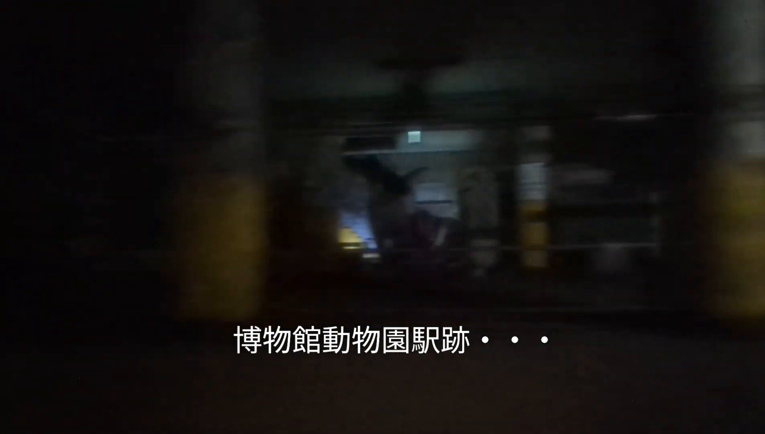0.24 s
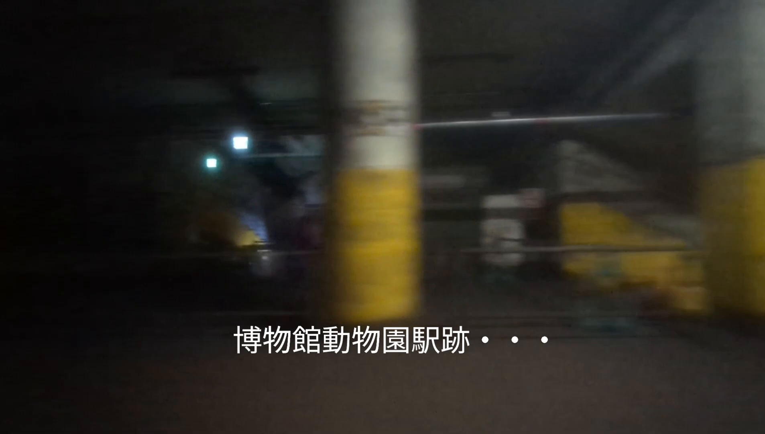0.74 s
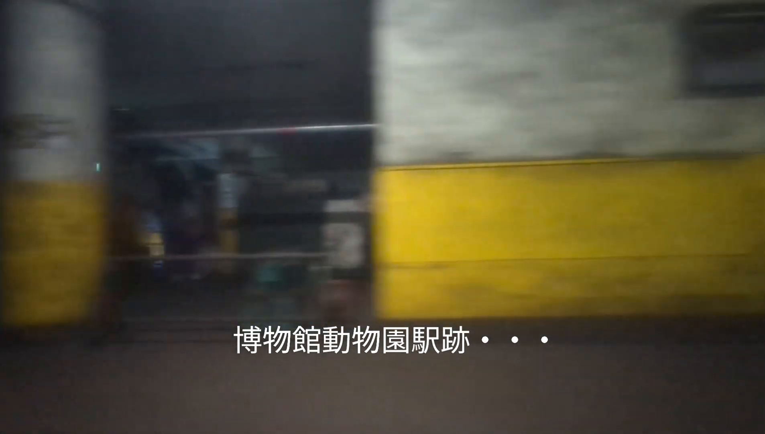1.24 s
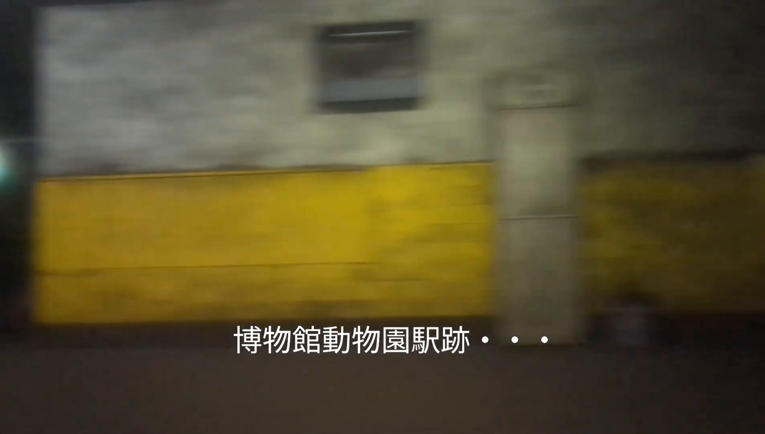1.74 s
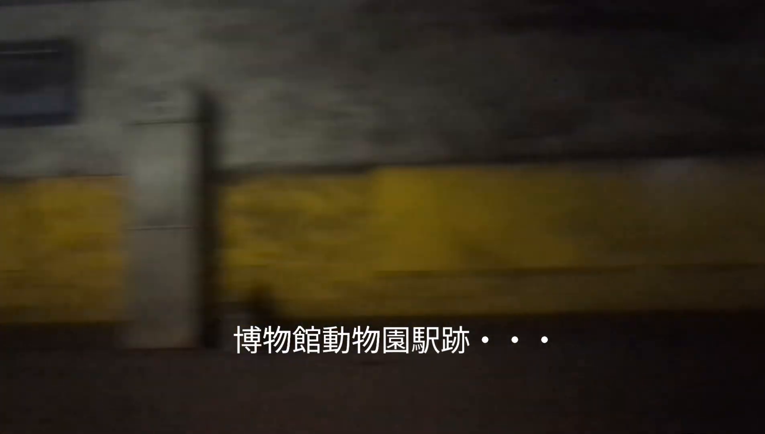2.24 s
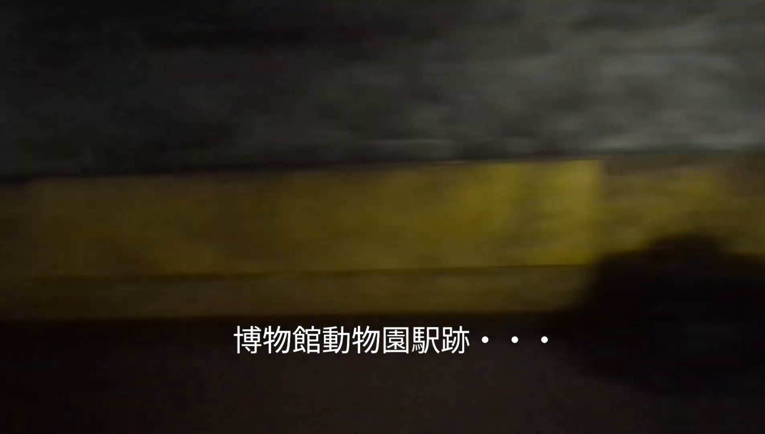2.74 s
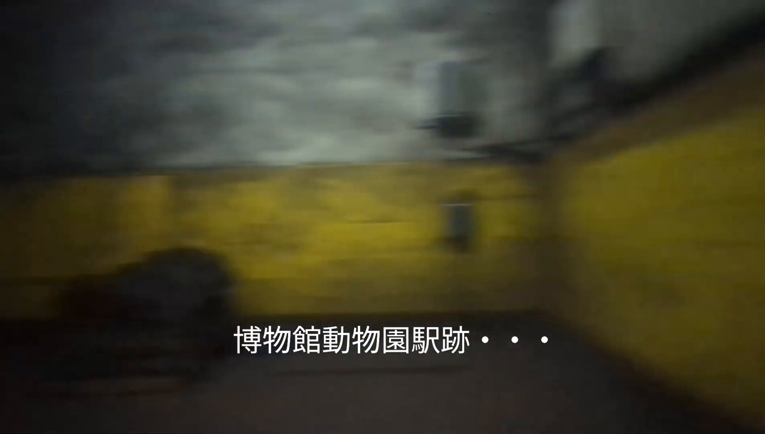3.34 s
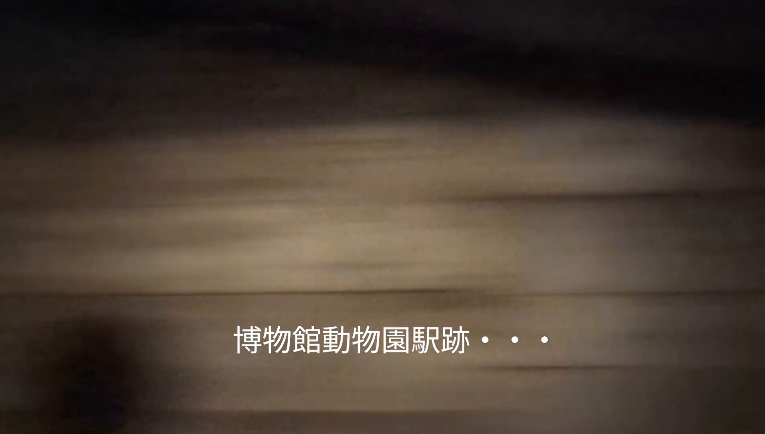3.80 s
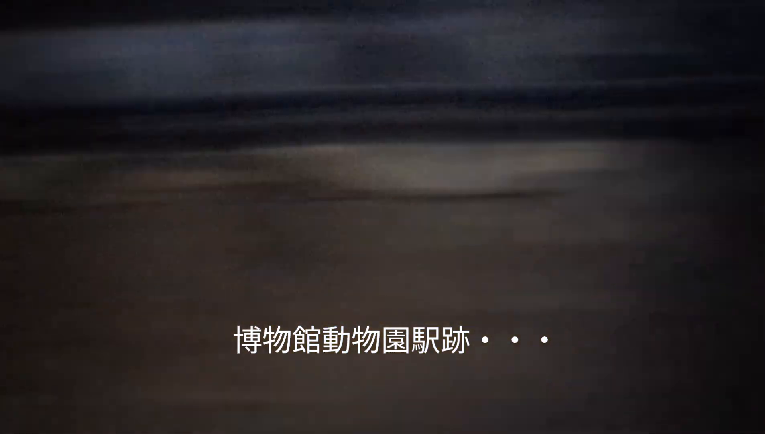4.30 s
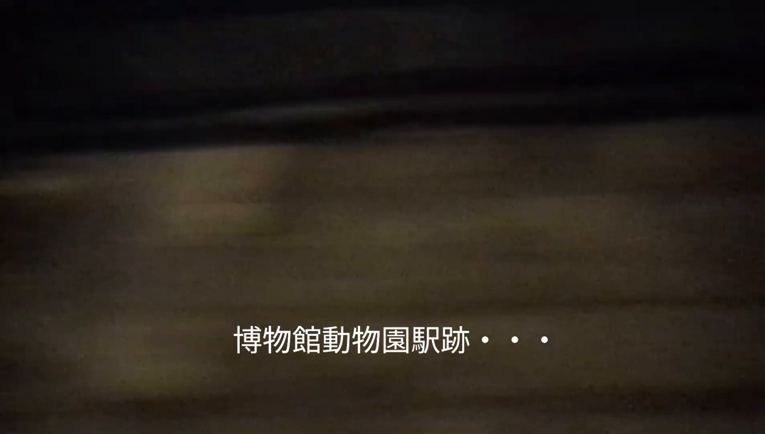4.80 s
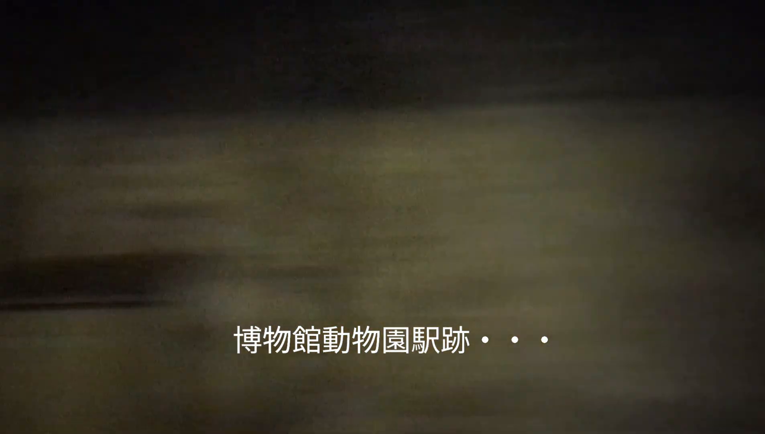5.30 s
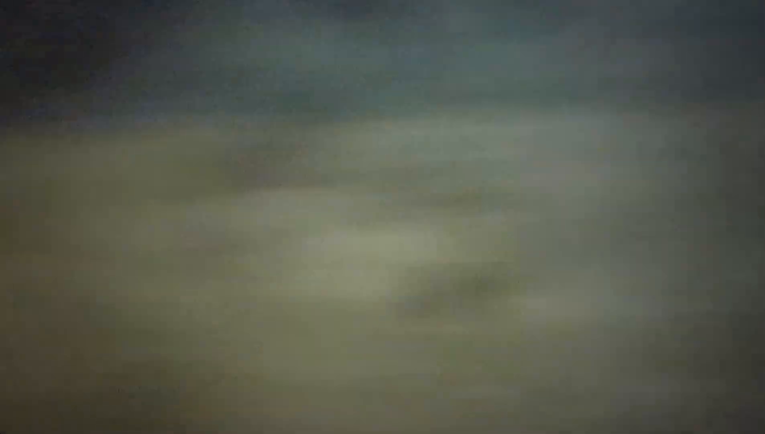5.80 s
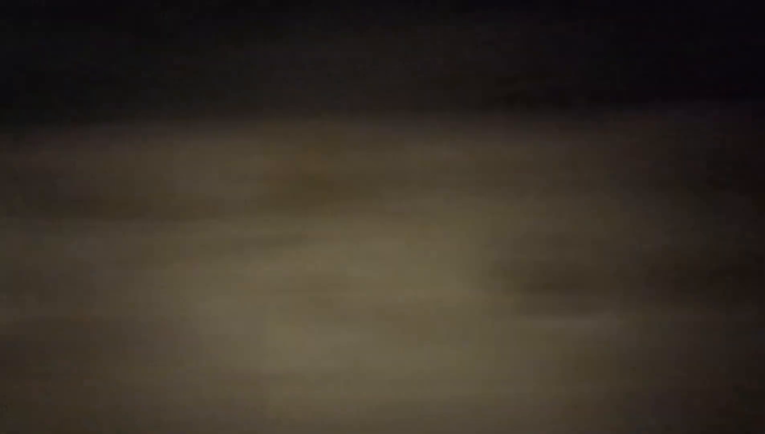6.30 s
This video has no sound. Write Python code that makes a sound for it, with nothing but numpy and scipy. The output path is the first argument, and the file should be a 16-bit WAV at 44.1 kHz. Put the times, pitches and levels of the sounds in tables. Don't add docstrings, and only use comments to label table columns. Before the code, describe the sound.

From 0 s a train already rolls steadily through an underground tunnel, heard inside the car on a nearby stereo microphone with subdued treble. A deep rumble around 50 to 80 hertz dominates, throbbing in uneven soft thumps several times a second, over muffled wheel and rail roar. Around 1.8 to 2.3 s rough rail makes the roar swell; a firm knock at 2.1 s leaves floor and wall panels humming briefly. From 2.5 to 3.3 s it settles, with very faint flange squeal. At about 3.4 s heavy body heaves begin and the roar thickens near closer walls. From 4.2 s small dry trim ticks scatter, with tiny pings at 4.9 s. The booms continue through 5 to 6 s while draughty hiss rises; clustered clanks come at 5.7 to 6.1 s. The roar then eases, ending mid-ride around 6.5 s with a low jolt.

```python
import sys
import numpy as np
from scipy import signal
from scipy.fft import rfft, irfft, next_fast_len
from scipy.io import wavfile
from scipy.ndimage import uniform_filter1d

SR = 44100
rng = np.random.default_rng(int(sys.argv[2]) if len(sys.argv) > 2 else 0)


def rack_gain(trim_db):
    fader = np.asarray(trim_db, float)
    return 10 ** (fader / 20)


def store_wav(level_fs):
    pcm = np.round(np.clip(np.atleast_2d(level_fs), -1, 1) * 32767)
    wavfile.write(sys.argv[1], SR, pcm.T.astype(np.int16))


N = 288833

# time_s, lift_db
WALL_NEARNESS = [(0, -1.5), (.3, 0.5), (.75, -1.5), (1.0, -1.5), (1.6, -0.5), (2.0, -1.5), (2.55, 1.5),
                 (2.72, -1.5), (3.1, 0), (3.55, 0.5), (3.8, 3), (4.6, 1), (4.85, 1.5), (5.3, 3), (5.6, 2.5),
                 (6.2, 2), (6.45, -0.5), (6.55, -1.5)]
# time_s, lift_db
WINDOW_DRAUGHT = [
    (0, 0),
    (1.7, -1),
    (2.0, 1),
    (3.5, 1.5),
    (3.9, 1.5),
    (5.0, 3.5),
    (5.25, 4),
    (6.2, 5),
    (6.55, 5),
]
# middle_s, roar_lift_db, length_s, floor_lift_db
ROUGH_STRETCHES = [(0.254, 2, 0.092, 0.5), (0.599, 0.5, 0.34, 3), (0.968, 1.5, 0.14, 0),
                   (1.372, 1.5, .15, -4), (1.893, 4.5, 0.28, 7.5), (2.069, 1, .06, -1.5),
                   (2.129, 1.5, 0.05, -5.5), (2.247, 6, 0.22, 7), (2.837, 2.5, 0.2, -0.5),
                   (3.202, 0, 0.11, 2), (3.685, -0.5, 0.23, 2.5), (3.946, 1.5, .17, 0.5),
                   (4.281, 3.5, 0.12, 1.5), (4.619, 0, 0.085, 2.5), (5.059, 1.5, 0.19, 3.5),
                   (5.312, 0.5, 0.13, 1), (5.619, 0.5, 0.078, 3.5), (5.733, 2, 0.19, 1.5),
                   (5.834, 0.5, .08, 1.5), (6.074, 5, 0.084, 1.5)]
# middle_s, rms_db, length_s, pitch_hz
BODY_HEAVES = [(0.315, -20.5, 0.032, 70.6), (0.422, -16.5, 0.018, 68), (0.491, -19, 0.039, 61.9),
               (0.582, -19.5, 0.039, 75.1), (0.677, -19, 0.029, 70.4), (0.861, -13, 0.031, 60.7),
               (1.155, -17, 0.017, 67.1), (1.333, -17, 0.077, 56.2), (1.42, -17, 0.026, 65.6),
               (1.545, -17, 0.05, 57), (1.717, -17.5, 0.034, 61.4), (1.838, -22, 0.025, 66.2),
               (1.902, -16.5, 0.021, 60.7), (2.104, -13.5, 0.044, 61.4), (2.214, -23, 0.023, 67.7),
               (2.297, -19, 0.043, 74.3), (2.522, -19, 0.03, 72.9), (3.202, -18, 0.047, 76.6),
               (3.43, -12, 0.032, 63.4), (3.543, -12.5, 0.025, 58.06), (3.636, -14, 0.041, 57.0),
               (3.748, -16, 0.024, 66.5), (3.847, -16, 0.044, 57.26), (3.936, -17.5, 0.026, 74.3),
               (4.052, -15, 0.056, 60.6), (4.146, -18, 0.034, 65.5), (4.218, -14.5, 0.024, 70.7),
               (4.325, -19.5, 0.021, 65.1), (4.431, -18.5, 0.042, 68.1), (4.547, -19, 0.038, 67.3),
               (4.609, -12, 0.021, 62.46), (4.667, -22.5, 0.016, 64.6), (4.93, -15, 0.078, 68.27),
               (4.986, -20, 0.0077, 70.7), (5.071, -13, 0.018, 76), (5.222, -13.5, 0.039, 66.1),
               (5.405, -17, 0.062, 64.7), (5.478, -14, 0.024, 69.5), (5.58, -15, 0.066, 58.8),
               (5.647, -26.5, 0.037, 73), (5.716, -12, 0.02, 65.8), (5.8, -20, 0.039, 71.3),
               (5.875, -15.5, 0.038, 66.1), (5.939, -18.5, 0.03, 64), (6.042, -18.5, 0.069, 59.35),
               (6.116, -26.5, 0.055, 63.5), (6.183, -15, 0.029, 66.95), (6.285, -19.5, 0.082, 62.8),
               (6.382, -20.5, 0.02, 68.7), (6.468, -19.5, 0.023, 74.7)]


def rms_one(x):
    return x / np.sqrt(np.mean(x ** 2) + 1e-20)


def in_time(rows):
    s, *columns = np.transpose(rows)
    return [np.interp(np.arange(N) / SR, s, c) for c in columns]


def at_hz(points, hz):
    point_hz, point_db = np.transpose(points)
    return np.interp(np.log(hz), np.log(point_hz), point_db)


def humps(rows, heights):
    t = np.arange(0, N + 64, 64) / SR
    bells = np.array([np.exp(-(2 * (t - s) / max(length, .02)) ** 2) for s, _, length, *_ in rows])
    return np.interp(np.arange(N) / SR, t, heights @ bells)


def drift(rate_hz):
    r = np.exp(-80 * np.pi * rate_hz / SR)
    noise = rng.standard_normal(N // 40 + 2002)
    slow = signal.lfilter([1], [1, -2 * r, r * r], noise)[2000:]
    return np.interp(np.arange(N) / 40, np.arange(len(slow)), rms_one(slow))


def resonate(x, hz, width_hz):
    r = np.exp(-np.pi * width_hz / SR)
    poles = [1, -2 * r * np.cos(2 * np.pi * hz / SR), r * r]
    return signal.lfilter([(1 - r * r) / 2, 0, (r * r - 1) / 2], poles, x)


def spread(x, left_db):
    return x * rack_gain(np.array([[.5], [-.5]]) * left_db)


def swings(rows, waver_hz):
    out, t = np.zeros(N), np.arange(N) / SR
    waver = np.cumsum(waver_hz * drift(8)) / SR
    for (s, db, length, hz), start in zip(rows, rng.random(len(rows))):
        near = slice(max(int((s - .4) * SR), 0), int((s + .4) * SR))
        bell = np.exp(-2 * ((t[near] - s) / max(length, .02)) ** 2)
        swing = np.sin(2 * np.pi * (hz * t[near] + start + waver[near]))
        out[near] += np.sqrt(2) * rack_gain(db) * bell * swing
    return out


def boom(even, side_db):
    # mode_hz, width_hz
    body_modes = [(49, 12), (62, 9.8), (84, 25)]
    # start_s, level_db, pitch_hz
    final_push = (6.5445, -11, 45)
    out = 0
    for (hz, width_hz), gain in zip(body_modes, body_levels()):
        x = resonate(resonate(rng.standard_normal((2, N + SR)), hz, width_hz), hz, 1.65 * width_hz)
        x = rms_one(x[:, SR:])
        power = uniform_filter1d(uniform_filter1d(x * x, size=2000), size=2000)
        swell = np.sqrt(np.abs(power) + 0.055)
        out = out + gain * rms_one(x / swell ** even)
    out[0] += swings(BODY_HEAVES, waver_hz=2.0)
    shell = signal.butter(2, [35, 112], "band", fs=SR, output="sos")
    mid, side = signal.sosfiltfilt(shell, out)
    s, db, hz = final_push
    t = np.maximum(np.arange(N) / SR - s, 0)
    push = rack_gain(db) * np.sin(2 * np.pi * hz * t)
    return mid + rack_gain(side_db) * side * [[1], [-1]] - push


def body_levels():
    rest_db = [-30, -25.5, -28]
    # time_s, lift_db
    track_bed = [(0, 1.5), (.6, -2.5), (1.0, -0.5), (1.5, 1.5), (1.95, -2.5), (2.02, -9), (2.2, 3.5),
                 (2.6, -0.5), (3.0, -4.5), (3.3, 2.5), (3.75, 3), (4.3, 3), (4.75, -0.5), (5.3, 3),
                 (5.9, 3.5), (6.3, 6), (6.42, -2.5), (6.55, -6)]
    # middle_s, lift_db, length_s
    hum_lulls = [(.09, -0.5, .05), (.225, -9, 0.052), (.36, -7, 0.034), (.77, -6, 0.058), (.905, -7, .03),
                 (.96, 3, 0.056), (1.085, -8, .03), (1.22, -6, 0.034), (1.385, -4, .03), (1.65, -2, 0.054),
                 (2.42, -1.5, .05), (2.66, 1, .04), (2.75, 1.5, .1), (2.97, -3.5, .1), (3.1, 4.5, .07),
                 (3.29, -9, 0.076), (3.36, 6, 0.046), (3.595, -8.5, .03), (3.69, -7, .03),
                 (4.185, -9, 0.028), (4.5, -5.5, .04), (4.75, -2, .08), (4.85, 0.5, 0.056),
                 (5.02, -5.5, .03), (5.31, -4.5, .05), (5.97, -6, .06), (6.11, 3, .05), (6.255, -8, 0.037),
                 (6.43, -5, .05), (6.5, -8, .04)]
    hush = 1 - .8 * np.minimum(humps(BODY_HEAVES, np.ones(len(BODY_HEAVES))), 1)
    lift_db = in_time(track_bed)[0] + humps(hum_lulls, np.array(hum_lulls)[:, 1])
    return rack_gain(np.array(rest_db)[:, None] + lift_db) * hush


def rolling(patchy_db, rough_db):
    layer_hz = [175, 420, 1350, 3600, 9000]
    # freq_hz, density_db_per_hz
    mid_spectrum = [(100, -4), (117, -8.5), (156, -6), (290, -3.5), (371, -9), (600, -13.5), (900, -22),
                    (1900, -30.5), (2100, -32.5), (3200, -42), (4500, -53), (6000, -60), (9000, -81),
                    (15000, -76)]
    # freq_hz, density_db_per_hz
    side_spectrum = [(100, 2.5), (135, -9.5), (240, -13.5), (487, 0.5), (617, -14), (1300, -19),
                     (1480, -19.5), (2100, -23.5), (3200, -35.5), (4500, -44), (6000, -51.5), (9000, -71),
                     (14500, -68), (15500, -73.5)]
    # freq_hz, left_minus_right_db
    stereo_lean = [(100, 1.5), (210, -0.5), (320, 2.5), (500, 0.5), (760, 0.5), (1150, 4.5), (1760, 3),
                   (2680, 2), (5000, -2)]
    # mode_hz, width_hz, mid_lift_db, side_lift_db
    car_resonances = [(132.2, 18, 10.5, -4.5), (195, 21, 6.5, -0.5), (412, 14, 4, -3.5), (490, 32, 5, -5.5),
                      (554.5, 22, 4, 5), (953, 24, 5, 6.5), (1210, 1100, 4.5, 9), (1720, 350, 5.5, -1.5),
                      (4020, 53, 3, 5.5), (7000, 550, 3, 3.5), (8500, 1100, 6, 4.5)]
    size = next_fast_len(N)
    hz = np.maximum(np.arange(size // 2 + 1) * SR / size, 1)
    peaks = np.array([1 / (1 + (2 * (hz - f) / w) ** 2) for f, w, *_ in car_resonances])
    mid_db, side_db = np.array(car_resonances)[:, 2:].T @ peaks
    mid, side = rfft(rng.standard_normal((2, size)))
    mid = mid * rack_gain(at_hz(mid_spectrum, hz) + mid_db) * hz ** 4 / (hz ** 4 + 90.4 ** 4)
    side = side * rack_gain(at_hz(side_spectrum, hz) + side_db - 8) * hz ** 4 / (hz ** 4 + 82.0 ** 4)
    pair = np.array([mid + side, mid - side]) * rack_gain(np.outer([.5, -.5], at_hz(stereo_lean, hz)))
    lifts_db = track()
    swells_db = lifts_db - lifts_db.mean(axis=1, keepdims=True)
    out, shared = 0, drift(35)
    for octave in np.arange(6, 14.5, .5):
        offset = np.log2(np.clip(hz, 64, 16384)) - octave
        window = np.cos(np.pi * np.clip(offset, -.5, .5)) ** 2
        place = np.interp(octave * np.log(2), np.log(layer_hz), np.arange(5))
        nearest_two = np.clip(1 - np.abs(place - np.arange(5)), 0, 1)
        swell_db = nearest_two @ swells_db
        flutter_db = patchy_db * drift(4.3) + rough_db * shared * (octave / 10) ** 0.53
        out = out + rack_gain(swell_db + flutter_db) * irfft(pair * window, size)[:, :N]
    return rack_gain(-28) * rms_one(out)


def track():
    by_walls = [1.1, 1.2, 0.97, 1, 2.6]
    by_draught = [.02, .02, 0.088, 0.81, 2.4]
    by_rail = [.1, .6, 0.948, 1.199, 1.4]
    by_floor = [0.46, 0.69, 0.35, 0.038, .05]
    _, rail_db, _, floor_db = np.transpose(ROUGH_STRETCHES)
    causes_db = [in_time(WALL_NEARNESS)[0], in_time(WINDOW_DRAUGHT)[0],
                 humps(ROUGH_STRETCHES, rail_db), humps(ROUGH_STRETCHES, floor_db)]
    return np.transpose([by_walls, by_draught, by_rail, by_floor]) @ causes_db


def panel_rings():
    # middle_s, rms_db, length_s, pitch_hz
    ring_events = [(.62, -36, 0.072, 190.6), (1.82, -27.5, 0.024, 195), (1.87, -25.5, 0.076, 206.2),
                   (2.125, -30.5, 0.018, 520), (2.148, -29.5, 0.035, 505), (2.15, -38, 0.037, 650),
                   (2.185, -37, 0.023, 600), (2.245, -42, .04, 1200), (2.25, -44, 0.019, 950),
                   (2.24, -37, .03, 420), (1.95, -35, 0.052, 195), (2.232, -25, 0.075, 134),
                   (2.24, -24.5, 0.019, 185), (2.31, -29, 0.089, 280), (2.57, -31.5, 0.029, 208),
                   (2.32, -25.5, 0.072, 214.4), (2.8, -38, 0.071, 506), (3.22, -39.5, 0.074, 520),
                   (3.33, -34.5, 0.033, 181), (3.43, -36, 0.085, 186.5), (3.57, -35, 0.079, 276),
                   (3.67, -34.5, 0.022, 295), (3.70, -32, 0.11, 204), (3.766, -32.5, 0.052, 133),
                   (3.945, -37.5, 0.067, 299), (4.0, -32, 0.04, 490), (4.253, -31.5, 0.033, 200),
                   (3.85, -35, 0.077, 530), (4.72, -34, 0.058, 202), (4.99, -33.5, 0.034, 287),
                   (5.1, -33.5, 0.088, 500), (5.17, -30.5, 0.07, 284), (5.19, -25, 0.044, 132),
                   (5.31, -29.5, .04, 313), (5.33, -42, 0.037, 129), (5.33, -32, 0.017, 515),
                   (5.62, -28, 0.04, 197), (5.63, -34, 0.026, 132), (5.77, -33, 0.04, 280),
                   (5.823, -28, 0.038, 222), (6.04, -36.5, 0.082, 500), (5.76, -39, 0.14, 548)]
    return spread(swings(ring_events, waver_hz=14), left_db=2)


def joints(bright_db):
    # start_s, peak_db, clank_hz, clank_t60_s, thud_db
    knocks = [(1.7882, -51.5, 2140, 0.52, 2), (2.2, -47.5, 4000, .8, -20), (1.9, -40.5, 2160, 0.3, -7),
              (2.1130, -19.5, 793, 0.25, -26), (2.113, -32.5, 1900, 0.15, -25.5),
              (2.2094, -44.5, 2300, 0.39, -14), (2.2683, -35, 2230, 1, 2.5),
              (2.792, -47.5, 2200, 0.57, -14.5), (4.9853, -34.5, 2220, 0.47, -11.5),
              (5.0, -39, 3900, 0.5, -20), (4.913, -32.5, 900, .08, -25), (6.1, -30, 800, .08, -25),
              (5.8, -25.5, 2470, 0.12, -19), (5.68, -30.5, 1200, .3, -25), (5.735, -25, 1300, 0.35, -25),
              (6.043, -23, 2200, 0.065, -28), (6.0356, -34, 3400, 0.091, -19),
              (6.0481, -22.5, 2000, 0.11, -27), (6.058, -21, 1600, 0.066, -26),
              (6.0515, -23, 1260, 0.8, -29)]
    out, t = np.zeros((2, N + SR)), np.arange(SR) / SR
    glass = signal.butter(2, 3500, "low", fs=SR, output="sos")
    for s, db, hz, t60, thud_db in knocks:
        noise = rng.standard_normal((3, SR))
        strike = noise[:2] + 1.5 * noise[2]
        clank = resonate(resonate(strike, hz, 0.9 * hz), hz, 2 * hz)
        clank = rms_one(signal.sosfilt(glass, clank))
        clank = clank * rack_gain(bright_db - 60 * t / max(t60, .05)) * (1 - np.exp(-t / .0015))
        thud = rms_one(resonate(resonate(noise[2], 205, 40), 205, 120))
        thud = thud * rack_gain(thud_db - 60 * t / .5) * (1 - np.exp(-t / 0.054))
        out[:, round(s * SR):][:, :SR] += rack_gain(db) * (clank + thud)
    return out[:, :N]


def squeal(share_db):
    # mode_hz, width_hz
    wheel_modes = [(3450, 83), (3660, 110), (3977, 110), (4265, 54), (2700, 290), (1837, 49)]
    modes_rest_db = [-82.5, -82, -85.5, -87.5, -79.5, -65]
    # middle_s, low_mode_lift_db, length_s, high_mode_lift_db, middle_mode_lift_db
    flange_rubs = [(0.573, 2, 0.047, 14, -4.5), (1.625, 3.5, .08, 0, 1), (1.9, 1.5, .2, 2, 3),
                   (2.27, 5, .12, 4, 9), (2.587, 8.5, 0.16, 8.5, 8.5), (2.84, 8, 0.15, 10, 5),
                   (3.112, 8, 0.09, 14, 2), (3.193, 13, 0.12, 1.5, 8), (3.662, 5, 0.09, 7, 5.5),
                   (3.997, 3, 0.1, -1.5, 6.5), (4.642, 7, 0.15, -2, 10), (4.88, 15, 0.036, 2, 6),
                   (5.033, 6, 0.2, 8.5, 8)]
    low_db, high_db, middle_db = (humps(flange_rubs, np.array(flange_rubs)[:, k]) for k in (1, 3, 4))
    sing_db = 2 * in_time(WINDOW_DRAUGHT)[0]
    rail_db = humps(ROUGH_STRETCHES, np.array(ROUGH_STRETCHES)[:, 1])
    load_db = 2.2 * in_time(WALL_NEARNESS)[0] + 1.8 * rail_db
    lifts_db = [low_db, middle_db, high_db, 0, sing_db - .6 * load_db, -.5 * load_db]
    out = 0
    for (hz, width_hz), rest_db, lift_db in zip(wheel_modes, modes_rest_db, lifts_db):
        mode = resonate(resonate(rng.standard_normal((2, N)), hz, width_hz), hz, 2 * width_hz)
        mode_db = rest_db + load_db + lift_db + share_db + 1.9 * drift(4.4)
        out = out + rack_gain(mode_db) * rms_one(mode)
    return out


def trim(tick_db, body_db, ping_db, crackle_db):
    # start_s, snap_db, left_minus_right_db, rattle_db
    tick_events = [(.622, -72, -0.5, -73), (1.145, -77.5, -2.5, -75), (2.273, -60, -2.5, -60),
                   (2.285, -63.5, 0.5, -61), (2.3, -61.5, 0.5, -63), (2.31, -64, 0, -63),
                   (2.6288, -64.5, -5, -63), (2.7867, -64, -5, -68), (3.8374, -68, -5, -61),
                   (3.895, -70, -4.5, -66.5), (3.9289, -64, -6.5, -59.5), (3.9937, -68, -7, -66),
                   (4.0228, -69.5, -13, -65.5), (4.1466, -67, -3, -62.5), (4.1925, -60.5, -3, -63),
                   (4.2206, -59.5, 3.5, -60.5), (4.232, -61, -2.5, -65), (4.283, -52, -7, -63),
                   (4.3711, -67.5, -5.5, -60), (4.4251, -57.5, -2.5, -63), (4.461, -60.5, 3.5, -63),
                   (4.57, -66, -3, -67), (4.674, -63, -4, -59), (4.7026, -66, -2.5, -65.5),
                   (4.7664, -51, -2.5, -52.5), (4.778, -65, -3, -62.5), (5.0708, -64.5, -1.5, -62),
                   (5.1475, -51, -12, -55.5), (5.2504, -59, -12.5, -70), (5.3134, -66, -1.5, -65.5),
                   (5.387, -56.5, 1.5, -56.5), (5.472, -54.5, 0.5, -68), (5.5543, -57.5, -5.5, -67.5),
                   (5.58, -60.5, -2, -63), (5.6404, -55.5, -3.5, -69), (5.681, -56, -6, -61),
                   (5.727, -62.5, -10.5, -58), (5.897, -61, -2, -71), (5.9776, -69, 2.5, -58),
                   (6.0325, -61, 0.5, -63.5), (6.0413, -57, -2, -56), (6.12, -60, -11.5, -62.5),
                   (6.176, -52, -9.5, -65), (6.2384, -65.5, -4, -69)]
    # start_s, peak_db, pitch_hz
    fitting_pings = [
        (0.5666, -59, 3650),
        (4.875, -41, 3450),
        (4.882, -42, 3450),
        (4.958, -45, 3500),
    ]
    out, t = np.zeros((2, N + 2000)), np.arange(2000) / SR
    noise = rng.standard_normal((2, len(tick_events), 2, 2000))
    snaps = 0.4 * noise[0] * np.exp(-t / 0.0015) * (1 - np.exp(-t / .0006))
    snaps = snaps + 1.6 * (np.arange(2000) == 45)
    rattles = noise[1] * np.exp(-t / 0.0022) * (1 - np.exp(-t / .0008))
    rattles = resonate(resonate(rattles, 4600, 5000), 4600, 7000)
    for (s, db, left_db, low_db), snap, rattle in zip(tick_events, snaps, rattles):
        tick = rack_gain(db + tick_db) * snap + rack_gain(low_db + body_db) * rattle
        out[:, round(s * SR):][:, :2000] += spread(tick, left_db)
    rush_db = -84.5 + track()[4]
    born = rng.random(N) < 110.0 * rack_gain(rush_db - rush_db.max()) / SR
    crackle = rack_gain(rush_db + crackle_db + rng.normal(0, 3, (2, N)))
    out[:, :N] += born * crackle * rng.choice([-1, 1], (2, N))
    out = signal.sosfilt(signal.butter(2, [2400, 15000], "band", fs=SR, output="sos"), out)
    for s, db, hz in fitting_pings:
        ring = np.sin(2 * np.pi * hz * t) * np.exp(-t / 0.0031) * (1 - np.exp(-t / 0.0022))
        out[:, round(s * SR):][:, :2000] += rack_gain(db + ping_db) * ring
    return out[:, :N]


def scene():
    running = boom(even=0.68, side_db=-22.5) + rolling(patchy_db=1.04, rough_db=0.73)
    running = running + panel_rings() + squeal(share_db=8.5)
    knocks = joints(bright_db=-16)
    return running + knocks + trim(tick_db=9.5, body_db=17.5, ping_db=0.5, crackle_db=15.0)


def low_pass(x):
    return signal.sosfilt(signal.butter(12, 15500, fs=SR, output="sos"), x)


def record(dry):
    # notch_hz, width_hz, depth_db
    port_notches = [(4130, 100, -5.5), (5900, 670, -9), (7400, 500, -8.5), (9940, 620, -10),
                    (13600, 600, -1.5)]
    mix = dry * np.minimum(np.arange(N) / 60, 1)
    mix = mix + rack_gain(-82.5 + .6 * drift(9)) * rng.standard_normal(mix.shape)
    mix = signal.sosfilt(signal.butter(4, 14800, "low", fs=SR, output="sos"), mix)
    for hz, width_hz, db in port_notches:
        mix = mix - (1 - rack_gain(db)) * resonate(mix, hz, width_hz)
    mix = .8 * np.tanh(mix / .8)
    return low_pass(mix)


dry = scene()
out = record(dry)
store_wav(out)
```